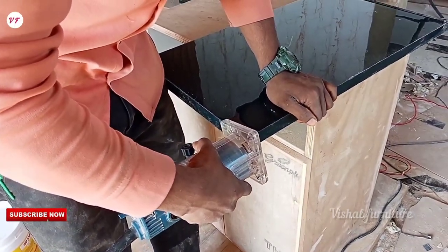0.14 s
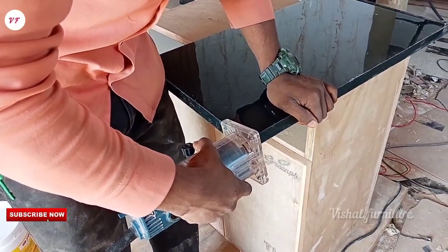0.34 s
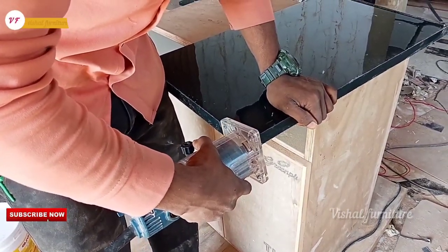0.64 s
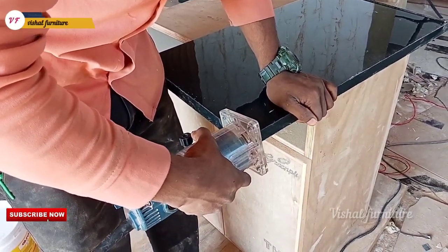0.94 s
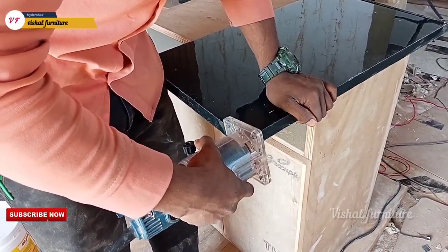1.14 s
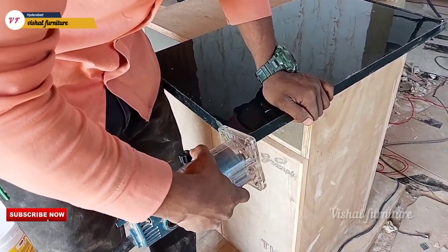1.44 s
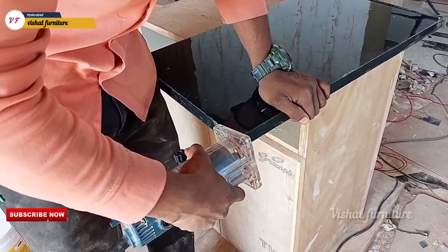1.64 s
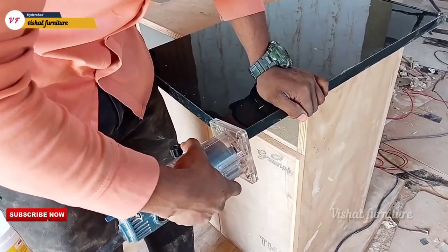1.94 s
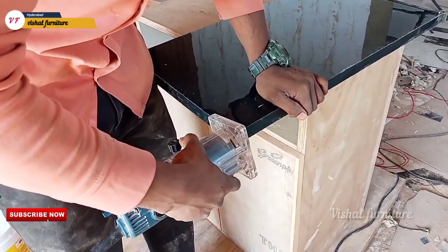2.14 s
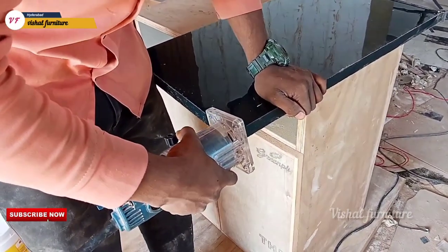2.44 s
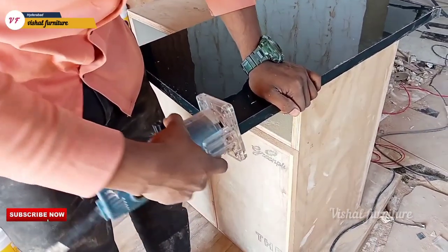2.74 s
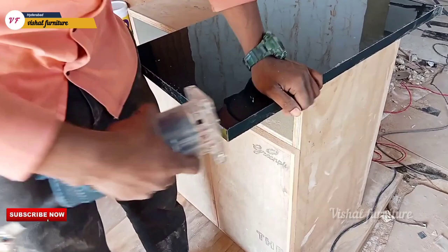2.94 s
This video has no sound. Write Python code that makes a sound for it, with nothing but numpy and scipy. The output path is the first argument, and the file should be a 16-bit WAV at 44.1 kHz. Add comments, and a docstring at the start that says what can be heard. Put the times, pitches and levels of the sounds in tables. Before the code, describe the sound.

A handheld electric trimmer runs throughout, close to a phone microphone in a workshop: shrill wavering whine and airy rush, buzzing harsher while cutting, then running clearer, with a second lighter bite near the end.

```python
"""A handheld electric trimmer, close to a phone microphone, runs along the edge of a panel in a workshop.
The shaft hums once a turn; its six-bladed cooling fan whines with overtones and rushes as coloured noise.
In two passes the two-edged bit bites, and its blows add other multiples of the turn rate; load slows the shaft.
The tones follow drawn swells and fades, as of a tool moving among echoes; sparse reflections comb the rush.
Narrow bands of noise make the wavering low hum of the shop."""
import sys
import numpy as np
from scipy import signal
from scipy.fft import rfft, irfft
from scipy.io import wavfile

SR = 44100
rng = np.random.default_rng(int(sys.argv[2]) if len(sys.argv) > 2 else 0)


def digitize_waveform(pressure):
    """Quantize a signal to 16-bit integers and store it at the path in sys.argv[1].

    Rows of a 2-D input are taken as channels; values are limited to [-1, 1].
    """
    field = np.atleast_2d(pressure).T
    bounded = np.clip(field, -1, 1)
    quanta = np.round(bounded * 32767).astype(np.int16)
    wavfile.write(sys.argv[1], SR, quanta)


N = 136710
TIME_S = np.arange(N) / SR


def amp(db):
    """Amplitude factor of a level in dB."""
    return 10 ** (np.asarray(db) / 20)


def rms_one(x):
    """Scale a signal to an rms of 1."""
    return x / np.sqrt(np.mean(x ** 2) + 1e-20)


def in_time(rows):
    """Join the points of each column by straight lines over time."""
    start_s, *columns = np.transpose(rows)
    return [np.interp(TIME_S, start_s, column) for column in columns]


def swells(rows):
    """Levels in dB, joined by straight lines in amplitude: round swells, sharp dips."""
    start_s, *columns = np.transpose(rows)
    return [20 * np.log10(np.interp(TIME_S, start_s, amp(column))) for column in columns]


def drift(rate_hz):
    """Slow random wander of rms 1: noise smoothed by two equal poles at rate_hz."""
    step = 40  # samples between computed points
    settle = 2000  # points dropped while the filter settles
    pole = np.exp(-2 * np.pi * step * rate_hz / SR)
    noise = rng.standard_normal(N // step + 2 + settle)
    slow = signal.lfilter([1], [1, -2 * pole, pole * pole], noise)[settle:]
    return np.interp(np.arange(N) / step, np.arange(len(slow)), rms_one(slow))


# Shaft speed, sagging under load: start_s, speed_turns_per_s (before jitter)
SHAFT_SPEED = [(0, 436.2), (.1, 435.6), (.3, 432.8), (.74, 430), (1.1, 426.2), (1.24, 427.6), (1.45, 432.2),
               (2.1, 442.1), (2.3, 443.5), (2.75, 445.5), (3.1, 448.2)]
SPEED_JITTER, JITTER_HZ = 0.00049, 17  # rms fraction of the speed, rate of wander


def shaft_turns():
    """Shaft angle in turns: the running sum of a slightly unsteady speed."""
    speed, = in_time(SHAFT_SPEED)
    return np.cumsum(speed * (1 + SPEED_JITTER * drift(JITTER_HZ))) / SR


# Brief dropouts of single tones, by multiple of the turn rate: list of centre_s
TONE_GAPS = {2: [2.5, 2.605], 10: [2.34, 2.52], 12: [1.915], 18: [0.92, 1.02, 1.26, 1.32, 1.405]}
GAP_S = 0.022  # time scale of the fall and rise on each side of a gap
SHIMMER_DB, SHIMMER_HZ = 1.25, 14  # rms unsteadiness of every tone, rate of wander


def tone(turns, multiple, level_db):
    """A shimmering sine locked to a multiple of the shaft angle, passing through silence at its gaps."""
    start = rng.uniform(0, 2 * np.pi)
    gaps = [np.tanh((TIME_S - centre_s) / GAP_S) for centre_s in TONE_GAPS.get(multiple, [])]
    gate = np.prod(gaps, axis=0)  # flips polarity across each gap
    level = np.sqrt(2) * amp(level_db + SHIMMER_DB * drift(SHIMMER_HZ))  # rms to peak
    return gate * level * np.sin(2 * np.pi * multiple * turns + start)


# Once-a-turn hum of the shaft, rms before shimmer: start_s, level_db
SHAFT_HUM = [(0.0, -25.5), (0.36, -23), (0.66, -30.5), (0.8, -29), (0.99, -25.5), (1.33, -31),
             (1.39, -37.5), (1.85, -31), (2.11, -38), (2.13, -32.5), (2.75, -26.5), (2.85, -31),
             (3.05, -31), (3.09, -38)]
# Blade tone of the fan, six a turn, rms before shimmer and gaps: start_s, level_db
BLADE_TONE = [(0.0, -13.5), (0.22, -16.5), (0.26, -22), (0.34, -14), (0.42, -13.5), (0.46, -16),
              (0.76, -22.5), (0.95, -11), (1.0, -15), (1.06, -24.5), (1.08, -37), (1.17, -38), (1.215, -19),
              (1.26, -19), (1.285, -40), (1.32, -22), (1.42, -21), (1.46, -27), (1.49, -20.0),
              (1.68, -10.5), (1.73, -14.5), (1.86, -11), (1.98, -13), (2.05, -21), (2.08, -16.5),
              (2.25, -17), (2.31, -27), (2.45, -14), (2.54, -16), (2.8, -10.5), (2.95, -16.5), (3.09, -15)]
# Overtones of the blade tone, rms before shimmer and gaps:
# start_s, level_12_a_turn_db, level_18_a_turn_db, level_24_a_turn_db
BLADE_OVERTONES = [(0.0, -43, -41.0, -70.1), (0.15, -46, -36.5, -52), (0.18, -57.4, -27, -58),
                   (0.26, -38, -28, -46), (0.37, -43, -32.5, -59), (0.42, -34.5, -29.5, -52),
                   (0.73, -36, -29.5, -47.5), (0.97, -56, -33, -63), (1.09, -44, -30, -52),
                   (1.15, -46, -58, -53), (1.22, -47, -33, -70.1), (1.35, -41.5, -30.5, -49),
                   (1.47, -61, -37.5, -49), (1.51, -50, -47, -66), (1.69, -40, -36.5, -53.4),
                   (1.86, -37.5, -44, -57), (1.97, -31, -41, -48), (2.04, -35.5, -44, -55),
                   (2.15, -48, -41, -56), (2.29, -39, -40.6, -44.5), (2.5, -48, -60.6, -45),
                   (2.58, -35.5, -35.5, -70.1), (2.88, -45, -32, -70.1), (2.95, -35.5, -31.5, -70.1),
                   (3.09, -38, -41, -64.2)]


def motor(turns):
    """Unbalance hums once a turn; six fan blades whine at six a turn with overtones."""
    multiples = [1, 6, 12, 18, 24]
    levels = swells(SHAFT_HUM) + swells(BLADE_TONE) + swells(BLADE_OVERTONES)
    return sum(tone(turns, k, db) for k, db in zip(multiples, levels))


# Multiples of the turn rate carried by the main bite tones, in the order of the level columns below
BITE_MULTIPLES = [2, 3, 4, 5, 8, 10, 16]
# Main bite tones, one list per pass, rms before shimmer, gaps and touch: start_s,
# then level_2_db, level_3_db, level_4_db, level_5_db, level_8_db, level_10_db, level_16_db by multiple
BITE_PASSES = [
    [(0.0, -35, -25.5, -29, -28, -49, -57, -52), (0.11, -32, -17.5, -24, -28, -51.8, -39.5, -44),
     (0.19, -26, -18, -33, -32, -33, -38.4, -39.0), (0.28, -37.2, -24, -19.5, -36, -23.5, -41.5, -47),
     (0.37, -26.5, -41, -26, -24, -24, -32, -56.5), (0.41, -28.5, -33.4, -39, -24, -21.5, -35.0, -38),
     (0.47, -34.1, -28.5, -32, -35, -28, -48, -45), (0.56, -46, -38, -41, -49, -25, -38, -40),
     (0.65, -36.5, -33, -55, -34, -22.1, -42, -38), (0.69, -33, -38, -35, -42.0, -20.5, -36.1, -38),
     (0.75, -33.5, -31, -32, -33.1, -20.5, -33, -56.5), (0.82, -31.5, -28, -23.5, -32, -36, -38, -40),
     (0.88, -33.5, -29.1, -19, -29.5, -22, -47, -53), (0.94, -33.5, -34, -22, -34, -14.5, -42.2, -40),
     (1.0, -30.5, -36, -29.5, -30, -21, -32, -33), (1.05, -27.5, -26.5, -34, -25.5, -15.5, -29.5, -32),
     (1.11, -24.5, -29.5, -30, -47, -23.5, -25, -29), (1.18, -31.5, -37.5, -37.5, -48, -40, -45, -44),
     (1.31, -63, -54, -32, -47, -52, -60, -56.5)],
    [(2.105, -32, -42, -25, -40, -40, -43.5, -42), (2.16, -42, -39, -29.5, -37, -54, -39, -37),
     (2.25, -34.5, -29, -30, -32, -40, -41, -59), (2.66, -35.5, -48, -30, -37, -51.8, -41.5, -53),
     (2.71, -35, -30.5, -25, -35.6, -25, -38, -35), (2.76, -28, -33.5, -23, -33, -19.5, -36, -51),
     (2.8, -39, -47, -24.5, -52, -28, -37, -56.5), (2.89, -52, -50, -51, -50.5, -45, -45, -48)],
]
# Weaker bite tones: (multiple, index of the main tone followed, from 0), level_against_it_db before fading
BITE_FOLLOWERS = {(7, 2): -14.5, (9, 3): -12.5, (14, 6): -3.5, (20, 4): -27, (22, 4): -37, (26, 6): -22, (28, 5): -29, (30, 5): -25, (32, 6): -20, (34, 6): -19, (36, 5): -17.5}
FADE_DB, FADE_HZ = 3, 8.2  # extra rms wander of the weaker tones, rate of wander
LIFT_S = 0.013  # ramp as the bit enters or leaves the wood


def bit(turns):
    """Blows of the two cutting edges, heard as shaft-locked tones while the bit is in the wood."""
    out = 0
    for rows in BITE_PASSES:
        start_s, end_s = rows[0][0], rows[-1][0]
        if start_s == 0:
            start_s -= LIFT_S  # already fully in the wood
        touch = np.clip(np.minimum(TIME_S - start_s, end_s - TIME_S) / LIFT_S, 0, 1)
        levels = swells(rows)
        main = sum(tone(turns, k, db) for k, db in zip(BITE_MULTIPLES, levels))
        weak = 0
        for (multiple, followed), offset_db in BITE_FOLLOWERS.items():
            level_db = levels[followed] + offset_db + FADE_DB * drift(FADE_HZ)
            weak = weak + tone(turns, multiple, level_db)
        out = out + touch * (main + weak)
    return out


ECHO_DB, ECHO_T60_S = -5, 0.2  # echo level against the direct noise, time to die by 60 dB
SHIFT_PER_S = 0.58  # half turns of the blend between echo sets, as the tool moves


def echoes(x):
    """Two sets of sparse dying reflections comb the noise, blending into each other."""
    t = np.arange(SR // 4) / SR
    sparse = rng.random((2, len(t))) < .02
    tails = rng.standard_normal((2, len(t))) * sparse * amp(-60 * t / ECHO_T60_S)
    tails = tails * (t > .002)  # no reflection in the first 2 ms
    # play the noise twice and keep the second round, where the echoes have built up
    one, other = signal.fftconvolve(np.tile(x, (1, 2)), tails, axes=1)[:, N:2 * N]
    angle = np.pi * SHIFT_PER_S * TIME_S
    wet = np.cos(angle) * rms_one(one) + np.sin(angle) * rms_one(other)
    return (x + amp(ECHO_DB) * wet) / np.sqrt(1 + amp(2 * ECHO_DB))


# Colour of the air rush, a relative shape scaled to rms 1 before levels: freq_hz, density_db_per_hz
RUSH_COLOUR = [(30.0, -46), (55.0, -33), (100.0, -31), (140.0, -28.5), (270.0, -27.5), (420, -18),
               (600.0, -22), (680.0, -20.5), (760.0, -10), (1000.0, -17.5), (1280.0, -10.5), (1500.0, -18),
               (1880.0, -7), (2300.0, -9), (2900.0, -11.5), (3850.0, -7.5), (4300.0, -17), (4900.0, -25),
               (5700.0, -24.5), (7000.0, -17.5), (7700.0, -20), (9000.0, -30), (11500.0, -33),
               (14000.0, -32.5), (15400.0, -28)]
# Rush of air, before the overall lift and patches: start_s, level_db, treble_boost_db
RUSH_LEVEL = [(0.0, -33.5, 3), (0.21, -33.5, 2), (0.87, -33.5, 3), (0.96, -37, 5.5), (1.3, -34, 3.5),
              (2.5, -32.5, 3), (2.73, -33, 3.5), (3.1, -34.5, 3)]
RUSH_LIFT_DB, TREBLE_HZ = 7, 5000
PATCHY_DB, PATCHY_HZ = 1.75, 6  # rms wander of each band, rate of wander
THROB = 0.16  # swing of amplitude once a turn, as a fraction


def rush(turns):
    """Fan air as coloured noise, wandering in third-octave patches and throbbing once a turn."""
    hz = np.maximum(np.arange(N // 2 + 1) * SR / N, 1)
    colour_hz, colour_db = np.array(RUSH_COLOUR).T
    colour = amp(np.interp(np.log(hz), np.log(colour_hz), colour_db))
    spectrum = rfft(echoes(rng.standard_normal(N))) * colour
    spectrum /= np.sqrt(np.mean(irfft(spectrum, N) ** 2))
    level_db, treble_db = in_time(RUSH_LEVEL)
    place = np.clip(3 * np.log2(hz / 60), 0, 24)  # third octaves above 60 Hz
    out = 0
    for k in range(25):
        overlap = np.clip(1 - abs(place - k), 0, 1)  # triangular, crossfading with its neighbours
        band = irfft(spectrum * overlap, N)
        is_treble = 60 * 2 ** (k / 3) > TREBLE_HZ
        out = out + band * amp(PATCHY_DB * drift(PATCHY_HZ) + treble_db * is_treble)
    throb = 1 + THROB * np.sin(2 * np.pi * turns)
    return out * amp(level_db + RUSH_LIFT_DB) * throb


# Wavering low hum of the shop: pitch_hz, resonance_width_hz (of each filter stage), level_db (rms)
SHOP_HUM = [(77.4, 6, -75), (100.4, 5.8, -64), (156, 9, -72.5), (271.6, 17, -74)]


def low_hum():
    """Noise passed twice through narrow low resonances, so each hum wavers."""
    out = 0
    for pitch_hz, width_hz, level_db in SHOP_HUM:
        pole = np.exp(-np.pi * width_hz / SR)
        top = [1, 0, -1]
        bottom = [1, -2 * pole * np.cos(2 * np.pi * pitch_hz / SR), pole * pole]
        ring = signal.lfilter(top, bottom, rng.standard_normal(2 * N))
        ring = signal.lfilter(top, bottom, ring)[N:]  # drop the build-up
        out = out + amp(level_db) * rms_one(ring)
    return out


def scene():
    """One shaft angle drives motor, bit and rush; the shop hum joins them, alike in both channels."""
    turns = shaft_turns()
    mono = motor(turns) + bit(turns) + rush(turns) + low_hum()
    return np.tile(mono, (2, 1))


CUTOFF_HZ = 15560


def record(dry):
    """A steep elliptic low-pass cuts the top."""
    lowpass = signal.ellip(12, .5, 80, CUTOFF_HZ, fs=SR, output="sos")  # 0.5 dB ripple, 80 dB stop
    return signal.sosfilt(lowpass, dry)


dry = scene()
out = record(dry)
digitize_waveform(out)
```